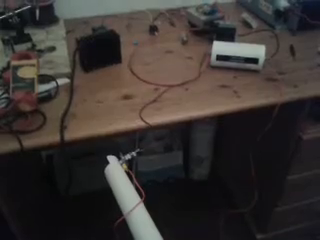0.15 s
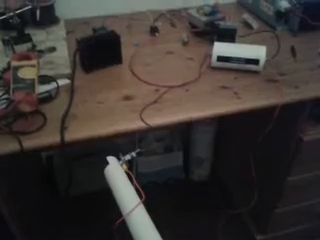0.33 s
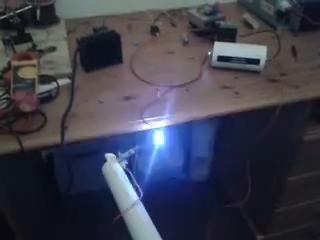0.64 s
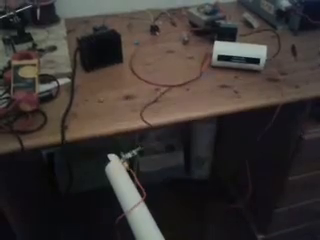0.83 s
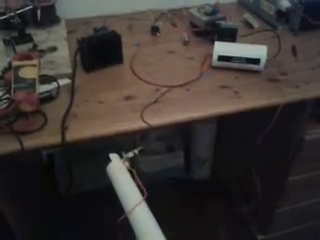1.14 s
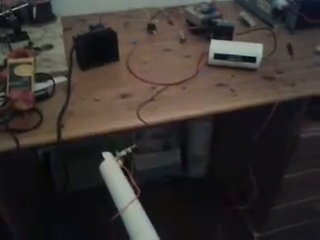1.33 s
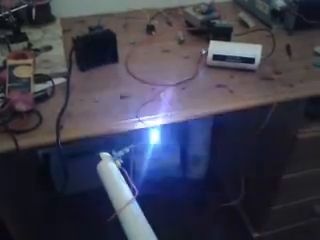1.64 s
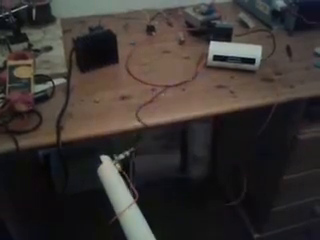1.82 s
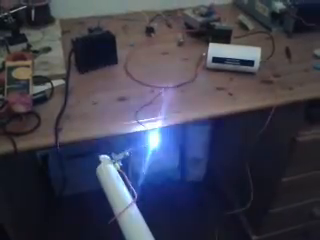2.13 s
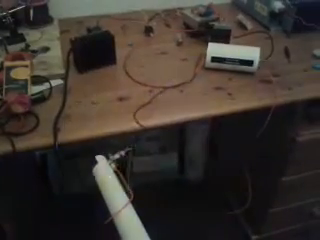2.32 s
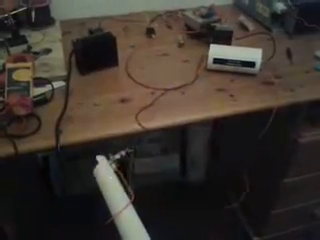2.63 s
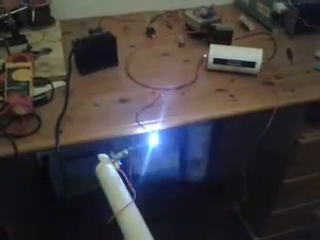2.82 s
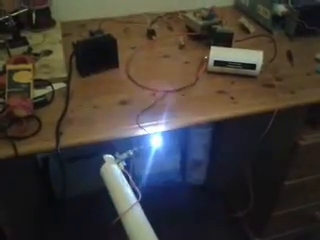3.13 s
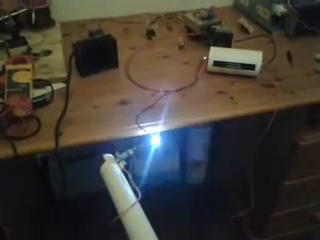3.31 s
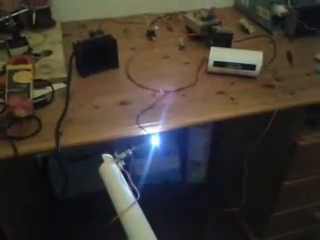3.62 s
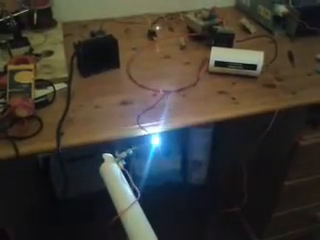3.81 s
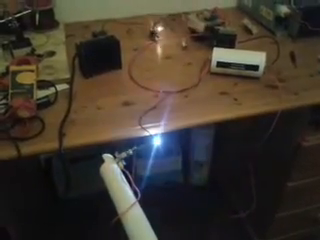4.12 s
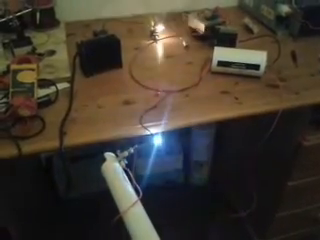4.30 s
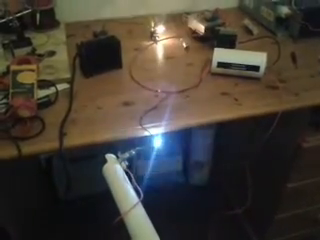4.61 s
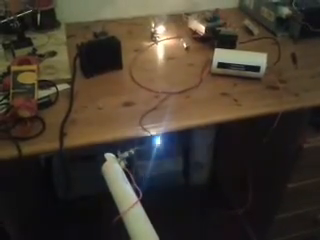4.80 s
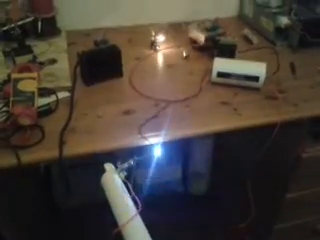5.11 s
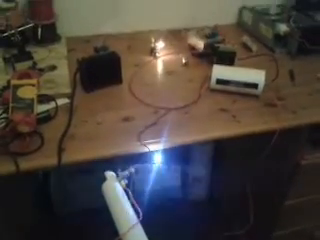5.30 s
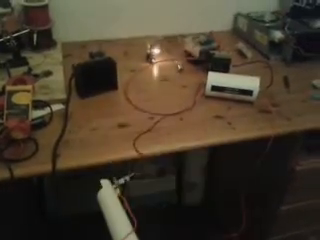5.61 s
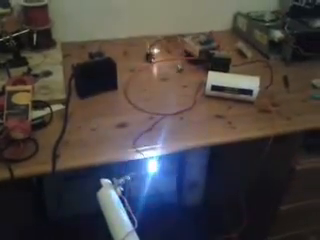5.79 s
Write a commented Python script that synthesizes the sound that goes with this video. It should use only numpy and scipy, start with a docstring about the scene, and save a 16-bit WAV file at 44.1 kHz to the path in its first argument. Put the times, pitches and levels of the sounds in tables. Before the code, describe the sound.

A quiet small workshop with faint microphone noise and a barely audible low hum. Loud electric cracks arrive in uneven clusters from a wire tip at a bench, then a long run of rapid sparks crackles for two seconds, speeding up and slowing. A tiny gap and two weak ticks precede a shorter, slowing run. The close, cheap microphone overloads, flattening the cracks.

```python
"""A small workshop: high-voltage sparks jump from a hand-held wire tip at a bench, into a small microphone.
Over quiet room and microphone noise a faint low hum swells; a faint hiss is smeared ahead of the first crack.
Single cracks follow, then a long run of sparks, two weak cracks and a last, shorter run. Each spark is one
sharp pulse with echoes, ringing modes and a room tail; a longer wait makes it louder. The sparks overload the
input, the band ends near 7 kHz, and their tops are flattened."""
import sys
import numpy as np
from scipy import signal
from scipy.fft import rfft, irfft
from scipy.io import wavfile
from scipy.ndimage import uniform_filter1d

SR = 44100
rng = np.random.default_rng(int(sys.argv[2]) if len(sys.argv) > 2 else 0)


def unload_audio(sound):
    """Save the sound as a 16-bit wav file, at the path given as the first command line argument."""
    columns = np.transpose(np.atleast_2d(sound))
    # keep every value between -1 and 1, then stretch to whole-number steps
    steps = np.round(np.clip(columns, -1, 1) * 32767)
    wavfile.write(sys.argv[1], SR, steps.astype(np.int16))


def invert_db(level):
    """Linear amplitude ratio for a level in decibels (20 dB per decade), elementwise."""
    return 10 ** (np.asarray(level, dtype=float) / 20)


N = 263277  # samples

# Single cracks, as the tip comes near and leaves again: start_s, pulse_peak_db (before scatter and overload)
SINGLE_CRACKS = [(0.8185, 35), (0.883, 31.5), (0.9615, 31), (1.7605, 38), (1.8144, 33.5), (1.8627, 31),
                 (1.918, 29.5), (1.9713, 29), (2.4551, 33.5), (2.528, 31), (2.8926, 34), (5.3314, -9.5),
                 (5.3352, -1.5)]
# Two runs, sparking faster as the tip is held nearer: time_s, rate_sparks_per_s
LONG_RUN_RATE = [(3.0051, 31.77), (3.445, 24.88), (3.478, 30.58), (3.745, 35.6), (4.018, 42.89),
                 (4.246, 42.99), (4.279, 40.57), (4.412, 69.94), (4.498, 119.43), (4.571, 94.91),
                 (4.612, 49.42), (4.638, 47.06), (4.678, 41.26), (4.765, 37.43), (4.852, 43.1),
                 (5.011, 28.03), (5.115, 87.9)]
LAST_RUN_RATE = [(5.357, 56.36), (5.39, 38.2), (5.597, 23.89), (5.643, 22.19), (5.76, 11.3)]
# Strength of the supply in the runs: time_s, pulse_peak_db (after a wait of 30 ms, before scatter and overload)
SUPPLY_STRENGTH = [(3, 21.5), (3.05, 24), (4.0, 23.5), (4.33, 20), (4.5, 24.5), (4.65, 18.5), (4.85, 19.5),
                   (5.12, 19.5), (5.36, 21), (5.55, 22.5), (5.76, 17)]
# Early echoes from bench, shelf and walls: delay_s, level_db (re direct pulse), sign (1 or -1)
EARLY_ECHOES = [(.00023, -2, -1), (.00118, -11, 1), (.00204, -14, 1), (.00317, -10, 1), (.00376, -7, 1),
                (.00497, -9, 1), (.00587, -14, 1), (.00687, -10, 1), (.00803, -8, 1), (.00959, -13, 1),
                (.01098, -12, 1), (.01297, -13, 1), (.0161, -13, 1), (.01925, -12, 1), (.02159, -14, 1)]
# Room and bench modes that ring on: pitch_hz, start_level_db (re spark drive), t60_s
RINGING_MODES = [(488, -70.5, 0.31), (834, -58.5, .38), (976, -61.5, 0.23), (2350, -51, 0.14),
                 (2904, -40.5, .15), (3296, -41.5, 0.2), (4396, -42, 0.17), (4656, -32, 0.089),
                 (4929, -37.5, 0.21), (5254, -40, 0.17), (5580, -37.5, 0.12), (5900, -40.5, 0.19),
                 (6020, -43, .12), (6730, -37.5, 0.11)]
# Colour of the diffuse room tail at its start: frequency_hz, relative_level_db (per Hz)
TAIL_COLOUR = [(150, -51.5), (300, -19), (700, -10.5), (1500, -9.5), (2900, -4), (4100, 0), (5000, 4.5),
               (7500, 6)]
# How long the room tail lasts: frequency_hz, t60_s
TAIL_DECAY = [(150, .18), (350, .22), (700, .27), (1500, .24), (3000, .23), (7500, .22)]
# Faint hiss smeared ahead of the first crack, no source at the bench: time_s, level_db (before its treble tilt)
SMEARED_HISS = [(.72, -64), (.75, -38.5), (.78, -38.5), (.818, -33)]
# One swell of the low hum: time_s, gain_db (added to each tone's level)
HUM_SWELL = [(.2, -96), (.27, -89), (.35, -81), (.42, -93), (.48, -97)]
# Tones of the hum: pitch_hz, relative_level_db
HUM_PITCHES = [(214, 19), (324, -7)]
# Colour of the quiet room and microphone noise: frequency_hz, relative_level_db (per Hz)
FLOOR_COLOUR = [(10, 9), (25, 5), (55, -20.5), (100, -21), (160, -18.5), (300, -3.5), (600, -4), (1200, -7),
                (3000, -11), (7000, -14.5)]

TIMING_SCATTER = 0.015  # share of the wait
DB_PER_DOUBLING, FULL_CHARGE_S = 10.5, 0.07  # a wait beyond full charge adds no loudness
SCATTER_DB = 1.02  # chance spread of the spark level
PULSE_HZ = 7720  # where the pulse's spectrum peaks
TIP_WANDER, TIP_JITTER = 0.38, 0.2  # radians per s, radians per spark
TAIL_DB, TAIL_BUILD_S = -24, 0.0022
CLUTTER_DB, CLUTTER_T60_S = -0.5, 0.22  # extra tail, fading on top of each band's own decay
EVEN_OVER_HZ = 150, 1200  # colour bumps between these widths are levelled
HISS_TILT = 0.35  # share of the previous sample taken away
FLOOR_DB = -58.5  # rms at the microphone
INPUT_TOP, INPUT_BOTTOM = 1.045, 0.99  # overload limits, full scale = 1
BAND_END_HZ, RIPPLE_DB, STOP_DB = 7050, 1.2, 56
LEAK_DB, LEAK_END_HZ = -36, 9100
OUTPUT_TOP, KNEE = 0.74, 42
SOFT_TOP_HZ, TOP_HZ = 16500, 15750


def sparks():
    """Each spark sends out a direct pulse, echoes, ringing modes and a tail that shifts as the tip moves."""
    start_s, peak_db = spark_list()
    chance = rng.standard_normal((len(start_s), 2))
    at = np.round(start_s * SR).astype(int)
    train, angle = np.zeros((2, N))
    train[at] = invert_db(peak_db + SCATTER_DB * chance[:, 0])
    angle[at] = TIP_WANDER * start_s + TIP_JITTER * chance[:, 1]

    early = train.copy()
    for delay_s, echo_db, sign in EARLY_ECHOES:
        lag = round(delay_s * SR)
        early[lag:] += sign * invert_db(echo_db) * train[:N - lag]

    # two independent tails, mixed by where the tip is
    tails = np.zeros(N)
    for share in (np.cos(angle), np.sin(angle)):
        tails += signal.fftconvolve(train * share, room_tail())[:N]
    modes = signal.fftconvolve(train, ringing())[:N]
    return n_pulse(early) + tails + modes


def spark_list():
    """Times and peak dB of all sparks; in the runs a longer wait builds more charge and a louder crack."""
    crack_s, crack_db = np.transpose(SINGLE_CRACKS)
    start_s, peak_db = [crack_s], [crack_db]
    for rate in (LONG_RUN_RATE, LAST_RUN_RATE):
        even = firing_times(rate)
        even_wait = np.diff(even, prepend=even[0])
        run = even + TIMING_SCATTER * even_wait * rng.standard_normal(len(even))
        last_crack_s = crack_s[crack_s < run[0]].max()
        wait = np.minimum(np.diff(run, prepend=last_crack_s), FULL_CHARGE_S)
        supply_db = np.interp(run, *np.transpose(SUPPLY_STRENGTH))
        start_s.append(run)
        peak_db.append(supply_db + DB_PER_DOUBLING * np.log2(wait / 0.03))
    return np.concatenate(start_s), np.concatenate(peak_db)


def firing_times(rate):
    """A spark at the start, then one each time the summed rate passes a whole number."""
    s, per_s = np.transpose(rate)
    t = np.arange(s[0], s[-1], 1 / SR)
    charge = np.cumsum(np.interp(t, s, per_s)) / SR
    return np.interp(np.arange(round(charge[-1]) + 1), charge, t)


def n_pulse(x):
    """Turn each impulse into an N-shaped pressure pulse: two opposite swings in quick succession."""
    phase = np.arange(-8, 9) / SR * PULSE_HZ * 2 * np.pi
    return np.convolve(x, phase * np.exp(0.5 - phase ** 2 / 2), "same")


def ringing():
    """Decaying sines: the modes of room and bench that every spark sets ringing."""
    t = np.arange(SR // 2) / SR
    return sum(invert_db(db - 60 * t / t60) * np.sin(2 * np.pi * hz * t) for hz, db, t60 in RINGING_MODES)


def room_tail():
    """Diffuse noise that builds up, then dies at its own pace in each third-octave band."""
    t = np.arange(SR // 2) / SR
    out = 0
    edges = 100 * 2 ** np.arange(0, 7.1, 1 / 3)
    for low, high in zip(edges, edges[1:]):
        hz = np.sqrt(low * high)
        band_filter = signal.butter(2, [low, high], "band", fs=SR, output="sos")
        band = signal.sosfilt(band_filter, rng.standard_normal(len(t)))
        out = out + band * invert_db(at_hz(TAIL_COLOUR, hz) - 60 * t / at_hz(TAIL_DECAY, hz))
    # scatter off the cluttered bench lifts the early tail most
    clutter = 1 + invert_db(CLUTTER_DB - 60 * t / CLUTTER_T60_S)
    build = 1 - np.exp(-t / TAIL_BUILD_S)
    return even_colour(invert_db(TAIL_DB) * out * clutter * build)


def even_colour(tail):
    """Level out chance bumps in the spectrum, keeping its fine lines and its overall slope."""
    size = 2 * len(tail)
    spectrum = rfft(tail, size)
    power = np.abs(spectrum) ** 2
    near, wide = (uniform_filter1d(power, size=round(hz * size / SR)) for hz in EVEN_OVER_HZ)
    return irfft(spectrum * np.sqrt(np.abs(wide / (near + 1e-20))))[:len(tail)]


def smeared_hiss():
    """Faint hiss smeared ahead of the first crack: noise tilted to the treble by a one-sample difference."""
    tilted = signal.lfilter([1, -HISS_TILT], [1], rng.standard_normal(N))
    return envelope(SMEARED_HISS) * tilted


def hum():
    """Two low steady tones that swell together."""
    t = np.arange(N) / SR
    tones = sum(np.sqrt(2) * invert_db(db) * np.sin(2 * np.pi * hz * t) for hz, db in HUM_PITCHES)
    return envelope(HUM_SWELL) * tones


def noise_floor():
    """Steady room and microphone noise, coloured in the spectrum."""
    hz = np.maximum(np.arange(N // 2 + 1) * SR / N, 1)
    spectrum = rfft(rng.standard_normal(N)) * invert_db(at_hz(FLOOR_COLOUR, hz))
    return invert_db(FLOOR_DB) * rms_one(irfft(spectrum, N))


def rms_one(x):
    """Scale to rms 1."""
    return x / np.sqrt(np.mean(x ** 2) + 1e-20)


def envelope(rows):
    """Gain from time_s, level_db rows, practically silent outside them."""
    s, db = np.transpose(rows)
    return invert_db(np.interp(np.arange(N) / SR, s, db, left=-150, right=-150))


def at_hz(points, hz):
    """Read a table on a log-frequency axis."""
    table_hz, value = np.transpose(points)
    return np.interp(np.log(hz), np.log(table_hz), value)


def low_pass(hz, order, ripple_db, stop_db):
    """Steep elliptic cut, which rings near its edge."""
    return signal.ellip(order, ripple_db, stop_db, hz, fs=SR, output="sos")


def scene():
    """Sparks, hum and noise at one microphone, plus the hiss smeared ahead of the first crack."""
    return (sparks() + smeared_hiss() + hum() + noise_floor())[None]


def top_cut(x):
    """Nothing passes above the cut-off."""
    return signal.sosfilt(signal.butter(12, 17010, fs=SR, output="sos"), x)


def record(dry):
    """The input saturates, a ringing filter ends the band with a little leakage, and peaks are clipped again."""
    x = signal.sosfilt(signal.butter(4, 9500, fs=SR, output="sos"), dry)
    x = np.clip(x, -INPUT_BOTTOM, INPUT_TOP)  # uneven rails turn overload into low thumps
    band = signal.sosfilt(low_pass(BAND_END_HZ, order=6, ripple_db=RIPPLE_DB, stop_db=STOP_DB), x)
    x = band + invert_db(LEAK_DB) * x
    x = signal.sosfilt(signal.butter(1, 14, "high", fs=SR, output="sos"), x)
    x = signal.sosfiltfilt(low_pass(LEAK_END_HZ, order=8, ripple_db=0.2, stop_db=35), x)
    x = x / (1 + np.abs(x / OUTPUT_TOP) ** KNEE) ** (1 / KNEE)  # flat top with a rounded knee
    # phase-true cuts keep the tops flat
    x = signal.sosfiltfilt(signal.butter(2, SOFT_TOP_HZ, fs=SR, output="sos"), x)
    x = signal.sosfiltfilt(low_pass(TOP_HZ, order=8, ripple_db=0.2, stop_db=35), x)
    return top_cut(x)


dry = scene()
out = record(dry)
unload_audio(out)
```